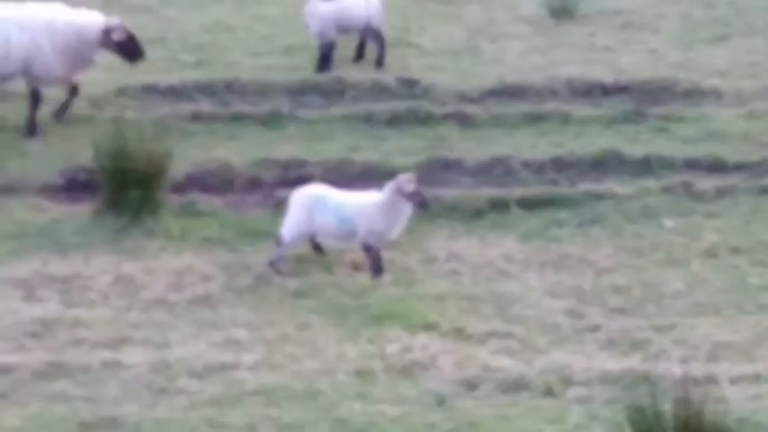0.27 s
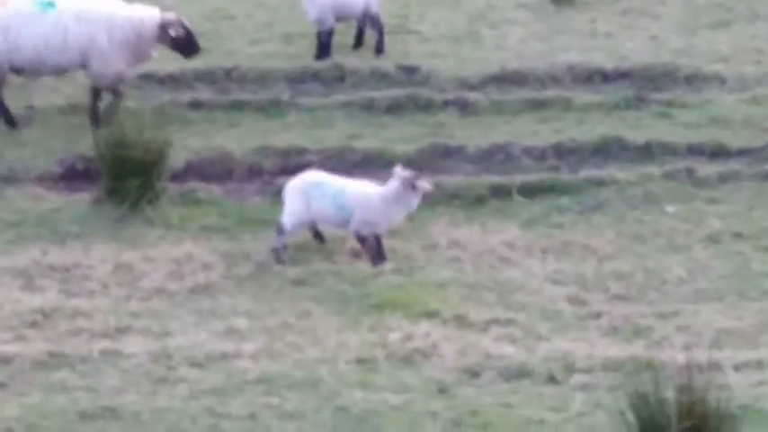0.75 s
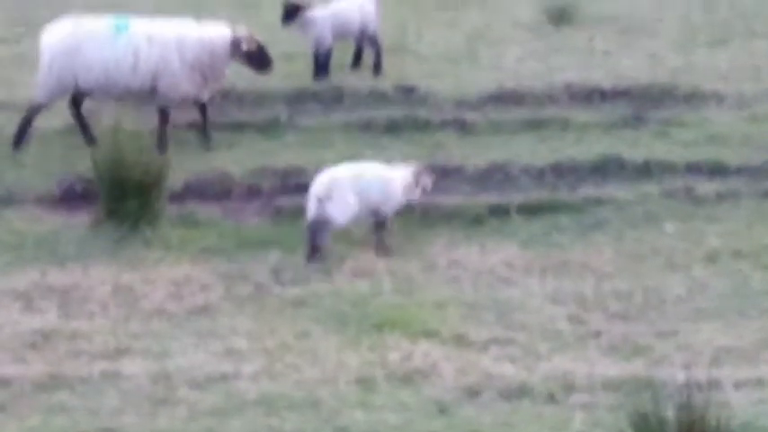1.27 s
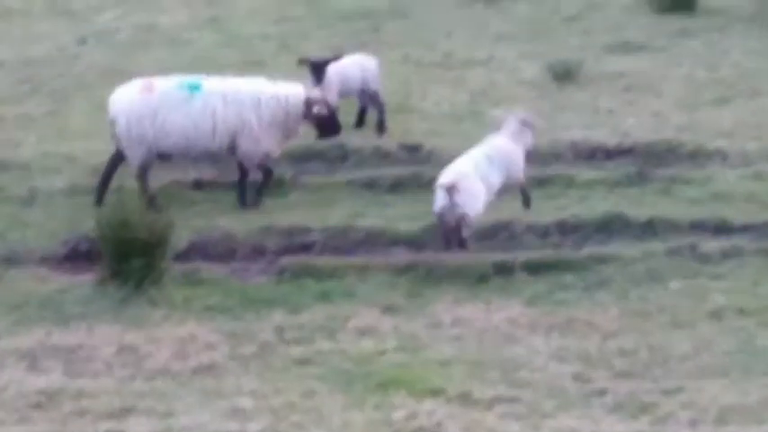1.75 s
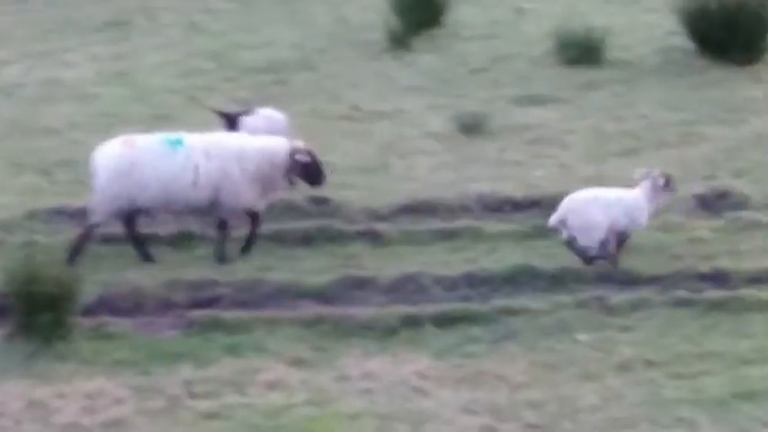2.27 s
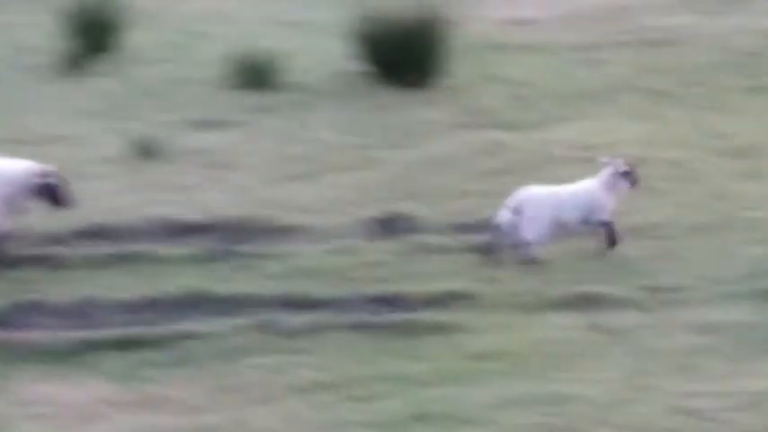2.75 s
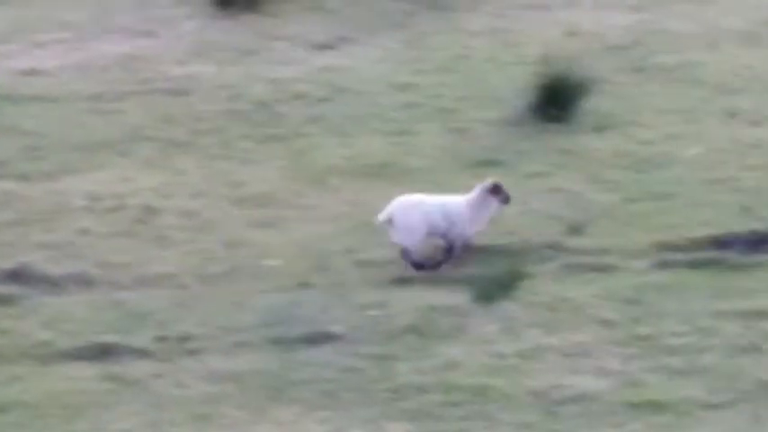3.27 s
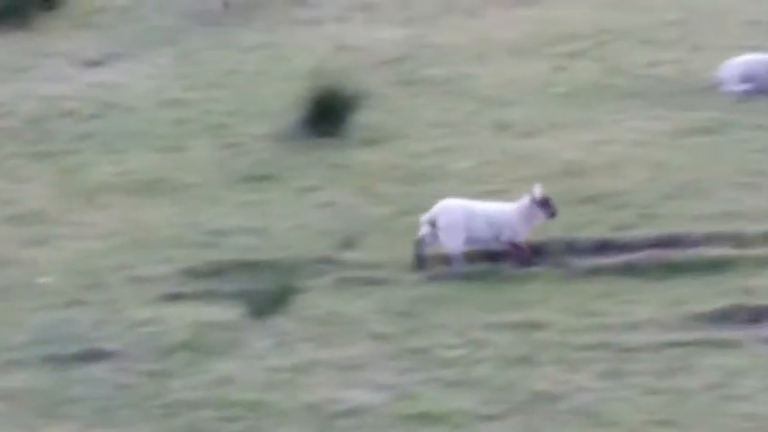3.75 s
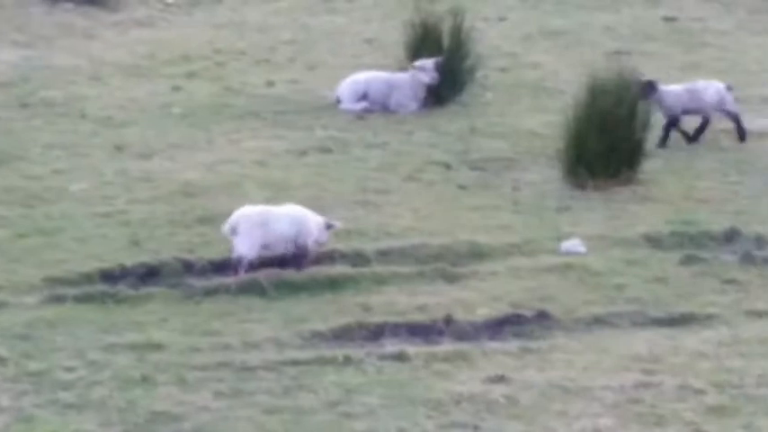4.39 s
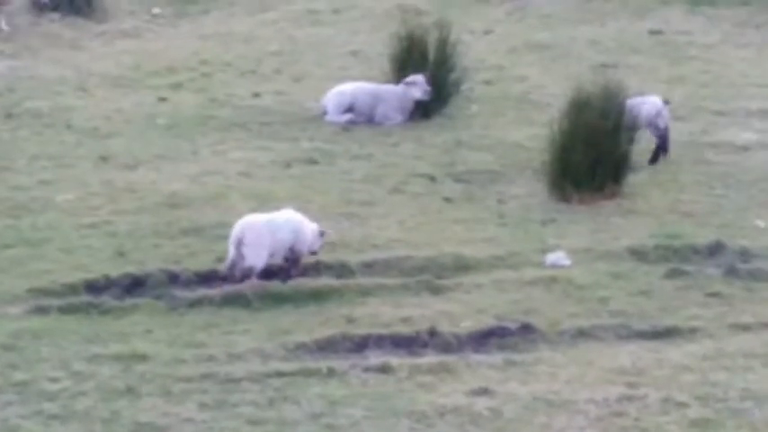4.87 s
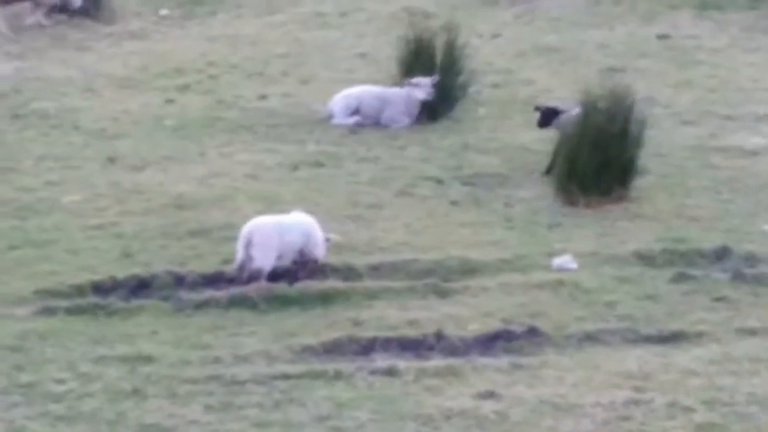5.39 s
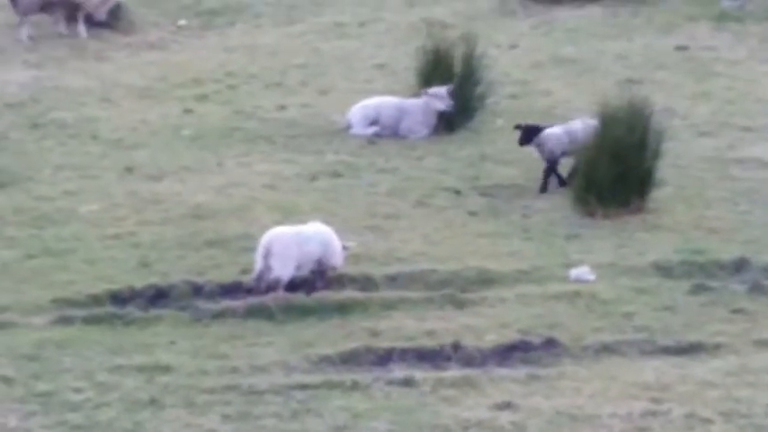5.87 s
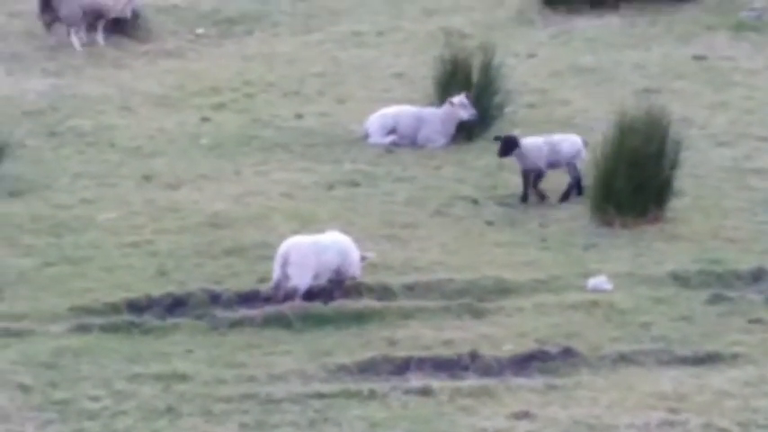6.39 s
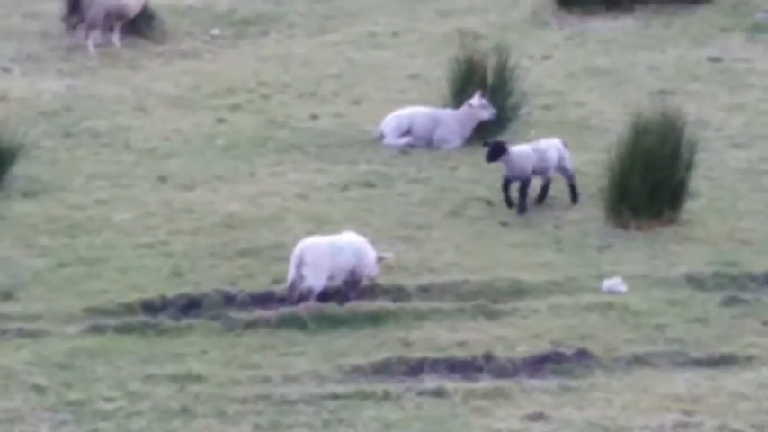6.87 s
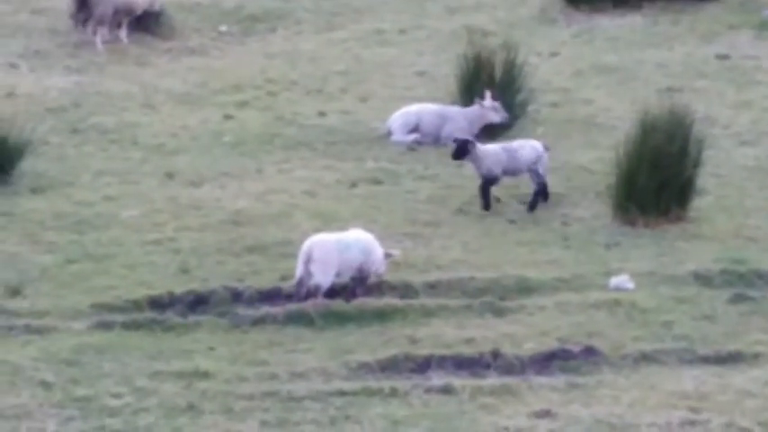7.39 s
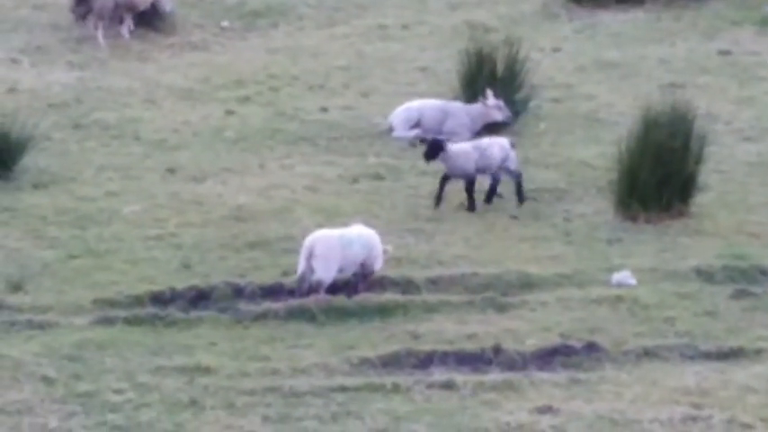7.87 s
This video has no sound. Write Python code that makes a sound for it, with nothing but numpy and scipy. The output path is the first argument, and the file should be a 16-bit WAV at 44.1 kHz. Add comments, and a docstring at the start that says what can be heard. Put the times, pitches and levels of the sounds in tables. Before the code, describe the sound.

A handheld stereo microphone in a grassy field picks up quiet twittering, wind puffs and low bumps mainly in the right channel. Background hiss and rumble swell midway as whistling birds become prominent. A short, bright lamb bleat comes first, slightly right, then a lower, raspy, trembling ewe bleat with a little outdoor echo. The background settles again, leaving scolding chirps, cheeps, and a low distant engine.

```python
"""An open pasture, heard through two microphone ports: a lamb and then a ewe bleat.
Each bleat is a train of vocal-fold pulses and air puffs that rings the resonances of a throat.
Songbirds whistle, chirp and twitter all round, as gliding near-sine notes. Shaped noise makes the wind
on the right port early on, and a background noise floor that the recorder's noise suppression lets
through more strongly midway. Handling knocks thump the right port, and a far engine starts to hum."""
import sys
import numpy as np
from scipy import signal
from scipy.fft import rfft, irfft
from scipy.io import wavfile
from scipy.ndimage import uniform_filter1d

SR = 44100
rng = np.random.default_rng(int(sys.argv[2]) if len(sys.argv) > 2 else 0)


def to_wav(sig):
    """Store sig (one row per channel, or 1-D mono) as 16-bit WAV at the path in sys.argv[1].

    Samples outside -1..1 are clipped; the rate is SR.
    """
    pcm = np.clip(np.atleast_2d(sig), -1, 1) * 32767
    pcm = np.round(pcm).astype(np.int16)
    wavfile.write(sys.argv[1], SR, pcm.T)  # frames by channels


N = 358952
TIME = np.arange(N) / SR


def amp(db):
    """Turns decibels into gain."""
    return 10 ** (np.asarray(db) / 20)


def evened(x):
    """Scales to rms 1."""
    return x / np.sqrt(np.mean(x ** 2) + 1e-20)


def curve(rows, t):
    """Reads every column of a time table at the times t, with straight lines between rows."""
    s, *columns = np.transpose(rows)
    return [np.interp(t, s, c) for c in columns]


def read(points, hz):
    """Reads a spectrum on a log-frequency axis."""
    f, value = np.transpose(points)
    return np.interp(np.log(hz + 1), np.log(f), value)


def colour(x, points):
    """Filters causally by a spectrum in dB, so that resonances ring after each pulse."""
    hz = abs(np.fft.fftfreq(4096, 1 / SR))
    log_gain = np.log(amp(read(points, hz)))
    # the minimum-phase filter with this gain
    taps = np.fft.ifft(np.exp(np.conj(signal.hilbert(log_gain)))).real
    return signal.oaconvolve(x, taps)[:len(x)]


def lowpass(order, hz):
    """Designs a filter that passes what lies below hz."""
    return signal.butter(order, hz, fs=SR, output="sos")


def wander(size, hz):
    """Random drift scaled to rms 1, mostly slower than hz."""
    length = 2 ** 17 if size > 2 ** 14 else 2 ** 14
    f = np.fft.rfftfreq(length, 1 / SR)
    slow = rfft(rng.standard_normal(length)) / (1 + (f / hz) ** 4)
    return evened(irfft(slow))[:size]


def add(mix, s, sound):
    """Mixes a sound in at time s."""
    part = mix[max(round(s * SR), 0):][:len(sound)]
    part += sound[:len(part)]


# How the left port colours sound. Each row: frequency in Hz, gain in dB.
LEFT_PORT_GAIN = [(700, 3), (2600, -5.5), (4600, 3), (12000, 11)]


def ports(x, lead_ms, left_db, right_db):
    """Sound reaches the left port slightly earlier; each port has its own level, the left its own tone."""
    hz = np.fft.rfftfreq(N, 1 / SR)
    advance = np.exp(2j * np.pi * hz * lead_ms / 1000)
    early = irfft(rfft(x) * amp(read(LEFT_PORT_GAIN, hz)) * advance, N)
    return np.array([amp(left_db) * early, amp(right_db) * x])


def field(x, wet_db, t60):
    """Scatter from the ground and the hillside, fading 60 dB in t60 seconds, different at each port."""
    t = TIME[:SR]
    tail = rng.standard_normal((2, SR)) * amp(-60 * t / t60) * (t > .008)
    tail /= np.linalg.norm(tail[0])
    return amp(wet_db) * signal.fftconvolve(x[None], tail, axes=1)[:, :N]


def voice(hz, throat, breath_db, count):
    """Pulses of the vocal folds, and a puff of air in each cycle, ring the throat."""
    turns = np.cumsum(hz) / SR
    pulses = sum(np.cos(2 * np.pi * k * turns) for k in range(1, count))
    puffs = rng.standard_normal(len(hz)) * np.exp(-2 * (turns % 1))
    return evened(colour(evened(pulses) + amp(breath_db) * evened(puffs), throat))


def mottle(x, depth_db=4):
    """The upper harmonics swell and fade, a few at a time."""
    z = signal.stft(x)[-1]
    patches = uniform_filter1d(rng.standard_normal(z.shape), size=6, axis=0)
    patches = evened(uniform_filter1d(patches, size=30))
    return signal.istft(z * amp(depth_db * patches))[-1][:len(x)]


# The lamb's bleat. Each row: time in seconds, pitch in Hz before smoothing, effort in dB before level_db,
# lowest throat resonance against the rest in dB before low_lift_db.
LAMB_BLEAT = [(3.87, 307.4, -57, -10), (3.938, 362, -39.5, -11), (3.962, 352.4, -40.5, -10.5),
              (4.016, 374.3, -37.5, -3.5), (4.226, 385.4, -38, -4.5), (4.502, 379.3, -41.5, 1),
              (4.58, 366.8, -41, 1), (4.645, 317, -54.5, -4)]
# The lamb's throat resonances. Each row: frequency in Hz, relative gain in dB.
LAMB_RESONANCES = [(380, -25), (765, -12), (1150, 3), (1530, -21.5), (1950, -21), (2680, 3), (3070, -12),
                   (3830, 5.5), (4250, -7), (5000, -10.5), (5370, -29), (5750, -14.5), (6150, -22.5),
                   (8800, -29), (10400, -32), (15500, -46.5)]


def lamb(level_db=2, low_lift_db=4, snap=0.54):
    """A clear, arching bleat of vocal-fold pulses through a throat, with an uneven, breathy top."""
    t = np.arange(LAMB_BLEAT[0][0], LAMB_BLEAT[-1][0], 1 / SR)
    hz, effort_db, low_db = curve(LAMB_BLEAT, t)
    hz = uniform_filter1d(hz, size=900) * (1 + .0013 * wander(len(t), 90))
    call = voice(hz, LAMB_RESONANCES, -21, count=46)
    low = signal.sosfiltfilt(lowpass(4, 1700), call)
    body = signal.sosfiltfilt(lowpass(4, 5200), call)
    # the folds snap shut, and so make treble, most strongly at full effort
    snap_db = snap * (effort_db - effort_db.max())
    treble = mottle(call - body) * amp(snap_db + 2 * wander(len(t), 16.0))
    call = body - low + treble + amp(low_db + low_lift_db) * low
    out = np.zeros(N)
    add(out, LAMB_BLEAT[0][0], amp(effort_db + level_db) * call * signal.windows.tukey(len(t), .05))
    scatter = field(out, -16, .025) + field(out, -27, .7)
    return ports(out, 0.2115, -2.9, 3.6) + scatter


# The tone of the ewe's bleat: her throat resonances; the sound also dips deeply near 5.1 kHz. Each row:
# frequency in Hz, relative gain in dB.
EWE_TONE = [(300, -15.5), (600, 0), (880, 0), (1300, -9), (2050, 9.5), (2650, -2.5), (3200, 10.5),
            (3800, 1.5), (4150, -4), (4750, 0), (5100, -13.5), (6200, -3), (7200, -10), (9000, -8),
            (15500, -45)]
# Catches in the ewe's voice. Each entry: time in seconds.
VOICE_CATCHES = [4.806, 4.882, 4.922, 4.961, 5.006, 5.051, 5.09, 5.124, 5.168, 5.245, 5.315, 5.365]
# She scoops up to one pitch, holds it, and lets it sag as her breath runs out.
EWE_START_S, EWE_LENGTH_S, EWE_ATTACK_S, EWE_RELEASE_S = 4.705, 0.77, 0.12, .21
EWE_HZ, EWE_SCOOP, EWE_DROOP = 310.4, .06, 0.18  # scoop and droop are shares of the pitch
EWE_DB, EWE_ONSET_DB, EWE_END_DB, EWE_TIRING_DB_PER_S = -39.5, -7, -19.5, 6
EWE_OPEN_S, EWE_DULL_DB = 0.12, 8  # the treble comes in as her mouth opens, and goes as it shuts


def ewe(sag=.09, dip_db=3.5, shimmer=0.17, ragged_db=4.0):
    """A hoarse, quavering bleat: at each catch pitch and level drop, then climb back; the end breaks up."""
    t = np.arange(0, EWE_LENGTH_S, 1 / SR)
    onset = np.maximum(1 - t / EWE_ATTACK_S, 0)
    release = np.maximum(1 - (EWE_LENGTH_S - t) / EWE_RELEASE_S, 0) ** 2
    # climbs from 0 to 1 between one catch and the next
    bounds = np.r_[EWE_START_S, VOICE_CATCHES, EWE_START_S + EWE_LENGTH_S]
    climb = np.interp(EWE_START_S + t, bounds, np.arange(len(bounds))) % 1
    slack = uniform_filter1d((1 - climb) ** 1.5, size=550)
    hz = EWE_HZ * (1 - EWE_SCOOP * onset - EWE_DROOP * release) * (1 - sag * slack)
    call = voice(hz * (1 + .008 * wander(len(t), 200)), EWE_TONE, -13, count=52)
    effort_db = EWE_DB + EWE_ONSET_DB * onset + EWE_END_DB * release - EWE_TIRING_DB_PER_S * t
    body = signal.sosfiltfilt(lowpass(4, 4500), call)
    mouth_shut = np.maximum(1 - t / EWE_OPEN_S, 0) + release
    call = body + mottle(call - body) * amp(-EWE_DULL_DB * mouth_shut)
    breaks_db = ragged_db * np.sqrt(release) * wander(len(t), 50)
    call *= amp(effort_db - dip_db * slack + breaks_db) * (1 + shimmer * wander(len(t), 110))
    out = np.zeros(N)
    add(out, EWE_START_S, call * signal.windows.tukey(len(t), .1))
    scatter = field(out, -5, .02) + field(out, -16, 1.2)
    return ports(out, 0.053, -6.5, 0.2) + scatter


def note(length, first, middle, last, db, wobble_rate=0, wobble_hz=0, waver=0.0012, flutter_db=4.0,
         fade_s=0.0072):
    """One near-sine note of a bird's syrinx, its pitch gliding along an arc."""
    t = TIME[:max(int(length * SR), SR // 200)]
    hz = np.polyval(np.polyfit([0, .5, 1], [first, middle, last], 2), t / t[-1])
    hz = hz * (1 + waver * wander(len(t), 120)) + wobble_hz * np.sin(2 * np.pi * wobble_rate * t)
    swell = signal.windows.tukey(len(t), min(fade_s / t[-1], 1)) * amp(flutter_db * wander(len(t), 66))
    if wobble_rate:
        swell *= 1 + 0.34 * np.cos(2 * np.pi * wobble_rate * t)  # louder while the wobble rises
    turn = 2 * np.pi * np.cumsum(hz) / SR
    return amp(db) * evened(swell * np.sin(turn))


def short_notes(rows, shape, waver):
    """Plays one note shape at the time, pitch and level of each row."""
    out = np.zeros(N)
    length, first, last = shape
    for s, hz, db in rows:
        add(out, s, note(length, first * hz, hz, last * hz, db, waver=waver))
    return out


def phrase(rows, level_db=-1, waver=0.0036, flutter_db=2.0):
    """One unbroken whistle that follows a curve of pitch and level."""
    t = np.arange(rows[0][0], rows[-1][0], 1 / SR)
    hz, db = curve(rows, t)
    turn = 2 * np.pi * np.cumsum(hz * (1 + waver * wander(len(t), 150))) / SR
    gain = amp(db + level_db + flutter_db * wander(len(t), 66))
    return gain * evened(np.sin(turn)) * signal.windows.tukey(len(t), .05)


# All bird levels below are in dB before the gains of the two ports.
# The fluting songbird's legato phrases, as curves.
# Each row: time in seconds, pitch in Hz, level in dB before the phrase's level_db.
FLUTED_PHRASE_1 = [(2.585, 2224, -64.5), (2.615, 2220, -51.5), (2.725, 1950, -56.5), (2.769, 2350, -49.5),
                   (2.847, 2260, -47), (2.875, 2207, -53)]
# The second phrase. Each row: time in seconds, pitch in Hz, level in dB, as above.
FLUTED_PHRASE_2 = [(3.103, 2390, -54), (3.153, 2864, -44), (3.192, 3100, -48), (3.304, 3166, -46.5),
                   (3.454, 2788, -50), (3.491, 2840, -54), (3.535, 2608, -42.5), (3.589, 2820, -46.5)]
# The third phrase. Each row: time in seconds, pitch in Hz, level in dB, as above.
FLUTED_PHRASE_3 = [(4.876, 2910, -47.5), (4.96, 2730, -48), (5.04, 2467, -48.5), (5.08, 2254, -51),
                   (5.13, 2187, -51), (5.229, 2564, -48.5)]
# A quickening run of downward slurs. Each row: start in seconds, middle pitch in Hz, level in dB.
SLUR_RUN = [(3.725, 2370, -48.5), (3.775, 2365, -51.5), (3.808, 2500, -46), (3.835, 2830, -42.5),
            (3.859, 2944, -44), (3.882, 2708, -48)]
# Single long whistles, each sagging a little in the middle.
# Each row: start in seconds, length in seconds, first pitch in Hz, last pitch in Hz, level in dB.
LONG_WHISTLES = [(2.131, 0.23, 2420, 2043, -66), (2.351, 0.077, 1573, 1565, -61.5),
                 (2.749, .06, 4100, 3290, -64), (3.176, .18, 2106, 2264, -61),
                 (3.542, 0.056, 3540, 3500, -44.5), (3.894, 0.092, 2590, 2460, -42),
                 (4.081, .11, 3660, 3980, -48), (5.742, 0.194, 2875, 2790, -72),
                 (6.281, 0.21, 2830, 1948, -67), (6.586, 0.17, 2185, 1770, -69.5),
                 (7.195, 0.29, 2770, 2299, -58)]
WHISTLE_SAG = 0.014  # share of the pitch
# A note shape: length in seconds, then first and last pitch as shares of the middle one.
SLUR_SHAPE = (0.0243, 1.05, 0.88)


def fluting_birds():
    """Legato phrases, a run of slurs and single long whistles, all near-sine tones of the syrinx."""
    out = short_notes(SLUR_RUN, SLUR_SHAPE, waver=0.029)
    for rows in (FLUTED_PHRASE_1, FLUTED_PHRASE_2, FLUTED_PHRASE_3):
        add(out, rows[0][0], phrase(rows))
    for s, length, first, last, db in LONG_WHISTLES:
        middle = np.sqrt(first * last) * (1 - WHISTLE_SAG)
        add(out, s, note(length, first, middle, last, db, waver=0.008, flutter_db=0.0, fade_s=0.041))
    return ports(out, 0.4, 0.2, 7.4) + field(out, -3, 0.11) + field(out, -6.5, 1.0)


# Thin chirps, sung with both sides of the syrinx at once.
# Each row: start in seconds, middle pitch of the upper voice in Hz, level in dB.
TWO_VOICED_CHIRPS = [(2.659, 8600, -65), (2.705, 8360, -59), (2.88, 8530, -63.5), (2.923, 8340, -55.5),
                     (3.454, 8100, -50), (3.554, 7900, -48.5), (3.662, 7060, -50.5), (3.688, 7570, -50.5),
                     (3.749, 7960, -51)]
# Rising chirps. Each row: start in seconds, middle pitch in Hz, level in dB.
RISING_CHIRPS = [(3.779, 6810, -44.5), (3.932, 6740, -48.5), (4.549, 4150, -47.5), (4.63, 3294, -47.5)]
# Sharp rising ticks. Each row: start in seconds, middle pitch in Hz, level in dB.
RISING_TICKS = [(5.369, 4860, -50), (5.478, 4840, -53.5), (6.205, 3840, -56), (6.274, 4840, -61.5),
                (6.395, 3930, -55)]
# Scolding notes that dive and hook back up. Each row: start in seconds, middle pitch in Hz, level in dB.
SCOLDING_HOOKS = [(6.23, 3110, -56), (6.292, 3300, -56.5), (6.42, 3540, -51.5), (6.472, 3200, -56)]
# Arched cheeps, each with a lower, softer, falling tail.
# Each row: start in seconds, middle pitch in Hz, level in dB.
ARCHED_CHEEPS = [(6.138, 3920, -52.5), (6.509, 4190, -59), (6.596, 4050, -57), (6.669, 3840, -57.5),
                 (6.79, 3850, -55), (6.92, 3810, -56), (7.04, 3550, -56.5), (7.394, 4230, -63.5)]
# Notes sung over and over. Each row: start, end, period and note length in seconds,
# first, middle and last pitch in Hz, level in dB.
REPEATED_NOTES = [(0.146, .98, 0.19, 0.058, 4200, 5510, 4270, -75),
                  (1.219, 1.7, 0.083, 0.037, 5730, 4470, 3920, -73),
                  (1.777, 1.88, .033, 0.0406, 3420, 4200, 3960, -72),
                  (4.262, 4.36, 0.028, .015, 5520, 6920, 6570, -51)]
# Trills, all with the same quick wobble.
# Each row: start in seconds, length in seconds, pitch in Hz, level in dB.
WOBBLING_TRILLS = [(1.135, 0.18, 2280, -71.5), (2.02, 0.13, 2080, -72), (2.653, 0.077, 2366, -57),
                   (3.011, 0.064, 3520, -48.5), (3.136, 0.019, 3540, -49.5), (3.15, 0.21, 4920, -62),
                   (4.013, 0.085, 3694, -47.5), (5.319, 0.057, 4900, -55), (5.426, 0.042, 5030, -55.5),
                   (1.551, .2, 2140, -77), (5.64, 0.43, 7490, -72), (6.338, 0.029, 4030, -57)]
# Note shapes: length in seconds, then first and last pitch as shares of the middle one.
THIN_SHAPE, UPSWEEP_SHAPE = (0.032, 1.117, 0.95), (.036, .94, 1.14)
TICK_SHAPE, HOOK_SHAPE = (0.0083, 0.896, 1.08), (0.0215, 1.39, 1.01)
CHEEP_SHAPE, TAIL_SHAPE = (0.022, 0.9, 0.86), (.036, 1.05, 0.794)
LOWER_VOICE, LOWER_VOICE_DB = 0.876, -1  # pitch as a share of the upper voice, and level against it
CHEEP_GAP_S, CHEEP_DROP, CHEEP_TAIL_DB = 0.021, 0.93, -7.5  # the tail against its cheep
WOBBLES_PER_S, WOBBLE_DEPTH = 50, 0.047  # depth is a share of the pitch


def small_birds():
    """Two-voiced thin chirps, upsweeps, scolding ticks and hooks, cheeps, repeated notes and trills."""
    lower_voices = [(s, hz * LOWER_VOICE, db + LOWER_VOICE_DB) for s, hz, db in TWO_VOICED_CHIRPS]
    tails = [(s + CHEEP_GAP_S, hz * CHEEP_DROP, db + CHEEP_TAIL_DB) for s, hz, db in ARCHED_CHEEPS]
    out = short_notes(TWO_VOICED_CHIRPS + lower_voices, THIN_SHAPE, waver=0.03)
    kinds = ((RISING_CHIRPS, UPSWEEP_SHAPE), (RISING_TICKS, TICK_SHAPE), (SCOLDING_HOOKS, HOOK_SHAPE),
             (ARCHED_CHEEPS, CHEEP_SHAPE), (tails, TAIL_SHAPE))
    for rows, shape in kinds:
        out += short_notes(rows, shape, waver=0.03)
    for start, end, period, *shape in REPEATED_NOTES:
        for s in np.arange(start, end, period):
            add(out, s, note(*shape, waver=0.023))
    for s, length, hz, db in WOBBLING_TRILLS:
        add(out, s, note(length, hz, hz, hz, db, WOBBLES_PER_S, WOBBLE_DEPTH * hz, waver=0.0285))
    return ports(out, 0.449, -7.0, 7.63) + field(out, -2, .06) + field(out, -5.5, 0.56)


# Far birdsong. Each row: time in seconds, typical note level in dB before near_db, middle pitch in Hz.
FAR_CHORUS = [(0, -69.5, 4055), (1.2, -72.5, 3925), (1.8, -64, 4230), (2.2, -81, 3795), (3.3, -56.5, 4313),
              (5.7, -66.5, 3562), (7.7, -68, 3420)]
FAR_LOWEST_HZ = 2695  # the spread of pitches grows with the height above this one


def far_birds(count=340, near_db=-2):
    """An unbroken far song of overlapping gliding notes, arched and slurred, wider when higher."""
    out = np.zeros(N)
    for k, (when, span, height, bend, slope, size) in enumerate(rng.random((count, 6))):
        s = (k + when) / count * N / SR
        db, mean_hz = curve(FAR_CHORUS, s)
        reach = mean_hz - FAR_LOWEST_HZ
        hz = mean_hz + reach * (height - .5)
        arch = 1.6 * reach * (bend - .45)
        fall = reach * (slope - .4)
        db += 8 * (size - .5)
        length = 0.01793 + .035 * span
        add(out, s, note(length, hz + fall, hz + arch, hz - fall, db, waver=0.0304, fade_s=0.017))
    scatter = field(out, -6, .6)
    return ports(amp(near_db) * out, 0.455, -28, 1) + scatter


# The strength of the wind. Each row: time in seconds, level in dB before level_db.
WIND_GUSTS = [(0.78, -60), (0.86, -46), (0.96, -64.5), (1.2, -44.5), (1.55, -41), (1.66, -54), (1.98, -54),
              (2.12, -41.5), (2.44, -44), (2.63, -40), (2.9, -51.5)]
# The tone of the buffeting. Each row: frequency in Hz, relative level in dB per Hz.
BUFFET_TONE = [(20, -13.5), (75, 5), (160, -1), (350, -9), (1400, -42.5), (4000, -94)]


def wind(level_db=5, left_db=-27, lump_db=4.5):
    """Wind turbulence as lumpy low noise, mostly on the exposed right port."""
    t = np.arange(WIND_GUSTS[0][0], WIND_GUSTS[-1][0], 1 / SR)
    out = np.zeros(N)
    noise = colour(rng.standard_normal(len(t)), BUFFET_TONE)
    turbulence = evened(noise * amp(lump_db * wander(len(t), 23.3)))
    gain = amp(curve(WIND_GUSTS, t)[0] + level_db)
    add(out, WIND_GUSTS[0][0], gain * turbulence * signal.windows.tukey(len(t), .04))
    return out * amp([[left_db], [0]])


# Handling knocks. Each row: time of the peak in seconds, thump level in dB,
# swing frequency in Hz, starting level of the crack in dB.
HANDLING_KNOCKS = [(1.223, -20.5, 118, -34), (1.271, -26.5, 234, -40), (1.399, -18, 164, -57),
                   (1.52, -21.5, 128, -48.5), (2.742, -20.5, 249, -29), (5.842, -41, 94.8, -76)]


def handling(left_db=-27):
    """Handling knocks, mostly on the right port: short low thumps, each with a dull crack of noise."""
    out = np.zeros(N)
    dull = lowpass(5, 1700)
    for s, db, hz, crack_db in HANDLING_KNOCKS:
        u = (TIME[:SR // 10] - .02) * hz  # cycles from the peak
        add(out, s - .02, amp(db) * np.exp(-1.8 * np.hypot(u, .1)) * np.cos(2 * np.pi * u))
        crack = evened(signal.sosfilt(dull, rng.standard_normal(len(u))))
        crack *= np.exp(-TIME[:len(u)] / 0.0028)
        add(out, s - .002, amp(crack_db) * crack)
    return out * amp([[left_db], [0]])


# A far engine's hum. Each row: time in seconds, pitch in Hz, level in dB.
ENGINE_HUM = [(6.4, 104.2, -68), (7.9, 115.4, -61)]
# The engine's dull roar. Each row: frequency in Hz, relative level in dB per Hz.
ROAR_TONE = [(450, -43), (650, -1), (820, 11), (1000, -15), (1400, -34.5)]


def engine(second_db=-20, roar_db=-13):
    """A far engine: a wavering, slowly rising hum of two harmonics, with a dull roar of shaped noise."""
    t = np.arange(ENGINE_HUM[0][0], N / SR, 1 / SR)
    hz, db = curve(ENGINE_HUM, t)
    turn = 2 * np.pi * np.cumsum(hz * (1 + 0.053 * wander(len(t), 16.6))) / SR
    hum = evened(np.sin(turn) + amp(second_db) * np.sin(2 * turn))
    roar = evened(colour(rng.standard_normal(len(t)), ROAR_TONE))
    out = np.zeros(N)
    add(out, ENGINE_HUM[0][0], amp(db + 2 * wander(len(t), 30)) * (hum + amp(roar_db) * roar))
    return ports(out, 0.16, -1.3, 0)


# The tone of the background noise floor. Each row: frequency in Hz, relative level in dB per Hz.
FLOOR_TONE = [(25, -21.5), (95, 3.5), (163, -7.5), (462, -36), (580, -36), (749, -19.5), (952, -26),
              (1310, -45), (2780, -45), (3630, -36), (5420, -38.5), (15000, -42)]
# How far the recorder's noise suppression opens.
# Each row: time in seconds, rise of the floor in dB before the share below.
SUPPRESSION_OPENING = [(0, 8.7), (1.8, 11.9), (2.3, 20.1), (2.8, 25.7), (4.6, 25.3), (5.4, 22.46),
                       (6.1, 13.8), (7, 9.3)]
# How much of the opening each pitch takes. Each row: frequency in Hz, factor on the rise in dB.
OPENING_SHARE = [(140, 0.18), (225, 1.214), (480, 1.375), (800, 1.028), (1400, 1.606), (12000, 0.14)]


def noise_floor(level_db=-66, patch_db=3.5, same=0.44):
    """Patchy background noise, let through more strongly midway as the noise suppression opens."""
    frames, hz = N // 256 + 5, np.fft.rfftfreq(1024, 1 / SR)
    a, b, c, d, patches = rng.standard_normal((5, frames, len(hz)))
    patches = uniform_filter1d(patches, size=14, axis=0)
    patches = evened(uniform_filter1d(patches, size=8, axis=1))
    frame_s = np.linspace(0, N / SR, frames)
    opening_db = curve(SUPPRESSION_OPENING, frame_s)[0][:, None] * read(OPENING_SHARE, hz)
    same = np.clip(same, 0, 1)  # how alike the two ports are
    right = a + 1j * b
    left = same * right + np.sqrt(1 - same ** 2) * (c + 1j * d)
    left = left * np.exp(2j * np.pi * hz * 0.000387)  # the left port leads by 0.387 ms
    z = np.array([amp(0.5) * left, right]) * amp(read(FLOOR_TONE, hz) + patch_db * patches)
    plain, opened = (signal.istft(v.swapaxes(1, 2), nperseg=1024, noverlap=768)[1][:, :N]
                     for v in (z, z * amp(opening_db)))
    return amp(level_db) * opened / plain.std()  # level_db is the level without the opening


def scene():
    """The whole pasture."""
    animals = lamb() + ewe() + fluting_birds() + small_birds() + far_birds()
    return animals + wind() + handling() + noise_floor() + engine()


def record(dry):
    """The recorder's band limit: a steep filter that takes away what lies above about 15.6 kHz."""
    taps = signal.firwin(511, 15600, window=("kaiser", 9), fs=SR)
    return signal.oaconvolve(dry, taps[None], "same")


dry = scene()
out = record(dry)
to_wav(out)
```